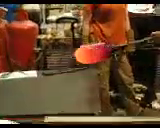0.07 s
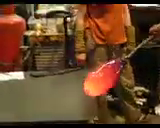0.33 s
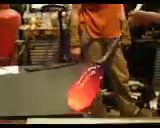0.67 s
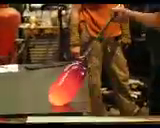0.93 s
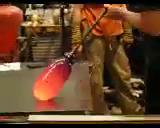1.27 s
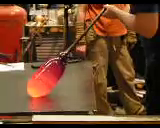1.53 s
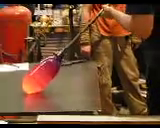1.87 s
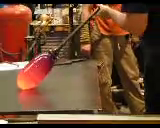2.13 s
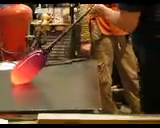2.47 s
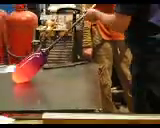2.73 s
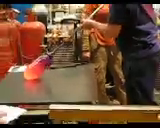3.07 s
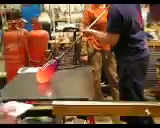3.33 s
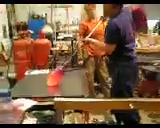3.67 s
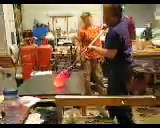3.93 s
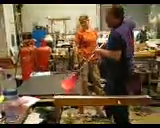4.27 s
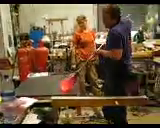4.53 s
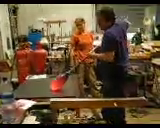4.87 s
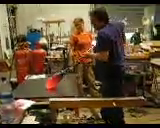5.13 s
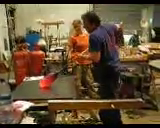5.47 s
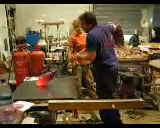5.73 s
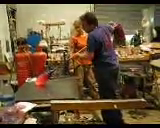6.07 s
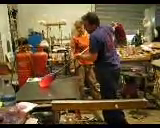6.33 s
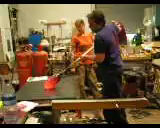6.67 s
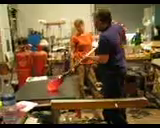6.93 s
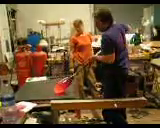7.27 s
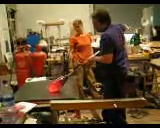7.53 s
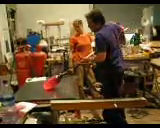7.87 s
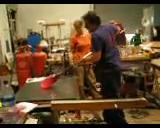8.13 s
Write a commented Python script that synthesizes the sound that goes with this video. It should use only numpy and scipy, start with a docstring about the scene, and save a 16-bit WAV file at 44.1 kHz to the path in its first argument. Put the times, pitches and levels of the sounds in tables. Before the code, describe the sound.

A gas furnace fills a glassblowing workshop with a steady, dense, slightly hollow roar. In front of it, a steel blowpipe scrapes and ticks as it is turned, briefly at the start and again in a longer run around the middle. After that, only a few faint, high squeaks come from the rolling pipe while the roar carries on. A small microphone makes everything sound a little dull.

```python
"""Glassblowing workshop

A gas furnace roars steadily as its swirling flame makes the chamber and the room ring.
A steel blowpipe scrapes and ticks as it is turned, and chirps faintly while hot glass is rolled on
the table. A small camera hears it all: it loses the high treble, turns itself down after the
sharpest ticks and flattens the highest peaks."""
import sys
import numpy as np
from scipy import signal
from scipy.fft import rfft, irfft
from scipy.io import wavfile
from scipy.ndimage import uniform_filter1d, minimum_filter1d

SR = 44100
rng = np.random.default_rng(int(sys.argv[2]) if len(sys.argv) > 2 else 0)


def transcribe(signal):
    """Save signal, clipped to [-1, 1], as a 16-bit WAV file at the path in sys.argv[1]."""
    frames = np.atleast_2d(signal).T
    limited = np.clip(frames, -1, 1)
    pcm = np.round(limited * 32767).astype(np.int16)
    wavfile.write(sys.argv[1], SR, pcm)


N = 365588
TIME = np.arange(N) / SR
FREQ = np.maximum(np.arange(N // 2 + 1) * SR / N, 1)

# The tone of the flame's rushing noise. Each row: frequency in Hz, relative level in dB.
FLAME_TONE = [(30, -31.5), (55, -26.5), (105, -6), (180, 0), (330, -4.3), (560, -3.6), (660, -1.8),
              (1150, -4.2), (1400, -9.4), (2300, -7.9), (3000, -11.3), (4200, -7), (6000, -30)]
# Notes where the furnace and room ring, and dips where echoes cancel.
# Each row: frequency in Hz, width in Hz, boost or cut in dB.
ROOM_NOTES = [(91, 11, -5.7), (131, 8, 2.7), (147, 17, -7.2), (195, 15, 3.0), (235, 37, 3.2),
              (277, 19, 6.4), (315, 26, 7.8), (386, 33, 6.9), (409, 15, -5.7), (436, 15, 5.9),
              (472, 71, 7.0), (528, 52, 7.3), (590, 26, 2.8), (636, 31, -4.0), (709, 17, -4.8),
              (824, 49, 4.8), (871, 20, 6.1), (904, 12, 2.5), (948, 8, -4.3), (1054, 44, 5.0),
              (1140, 26, 4.3), (1172, 11, 3.9), (1211, 39, 5.5), (1256, 30, 4.2), (1352, 23, 7.2),
              (1464, 30, 6.1), (1593, 36, 2.7), (1755, 34, 3.7), (1863, 77, 3.3), (2283, 30, 1.4)]
# The roar's low boom and hollow note swell and sink back.
# Each row: middle in seconds, length in seconds, boom change in dB, hollow note change in dB.
ROAR_SWELLS = [(0.216, 0.28, 8.5, 0.5), (1.294, 1.46, 3.5, 0.5), (3.35, 1.1, 4, -0.5), (4.758, .9, 4.5, 0),
               (7.416, 0.89, 0.5, 2.5), (8.055, 1.5, 7, .5)]
# The notes the steel pipe rings with. Each row: frequency in Hz, width in Hz, relative level in dB.
PIPE_NOTES = [(2480, 200, -10), (2770, 150, -7), (3015, 100, -1), (3135, 110, -2), (3330, 170, -4),
              (3500, 130, -4), (3980, 350, -1.5)]
# The turning pipe scrapes. Each row: start in seconds, end in seconds, level in dB.
SCRAPE_STROKES = [(0, 0.475, -17.7), (0.497, 0.594, -20), (0.855, 1.117, -24.5), (2.693, 2.847, -24.5),
                  (2.862, 2.933, -14.5), (2.958, 3.59, -16), (3.602, 3.848, -17), (3.873, 4.326, -18)]
# The pipe catches and ticks. Each row: start in seconds, ring level in dB, crack peak in dB.
PIPE_CATCHES = [(0.0714, -3.5, -12), (0.388, -2.5, -12), (0.423, -4.5, -17), (0.4712, 0, 8),
                (0.5908, -1, 6.5), (2.853, 2, -17), (2.922, -8.5, 5.5), (3.265, -7.5, -17),
                (3.545, -7, -12), (3.653, -7, 5.5), (3.7541, -1.5, 6.5), (3.903, -7, -1),
                (4.2648, -10.5, -18), (4.3213, -9, -14)]
# The rolling pipe chirps.
# Each row: start in seconds, length in seconds, middle pitch in Hz, pitch slide in Hz, level in dB.
PIPE_CHIRPS = [(.87, .23, 2970, 40, -27.5), (4.39, .09, 3600, 0, -29), (4.62, .16, 3620, 0, -32),
               (7.34, .1, 3570, 180, -26.5), (7.63, .06, 3410, 0, -27.5), (8.045, .125, 3465, -130, -24)]
# How the camera loses the treble. Each row: frequency in Hz, gain in dB.
CAMERA_TONE = [(2800, 0), (3450, -8), (4000, -26), (4400, -43), (4700, -70), (5200, -110)]


def furnace(level_db=-12.5, flutter_db=0.42, throb_db=0.83):
    """The fluttering flame rings the chamber; a low boom and a hollow note throb and swell."""
    flame = rng.standard_normal(N) * undb(flutter_db * wander(per_second=14))
    room_db = sum(db * abs(resonance(hz, width)) ** 2 for hz, width, db in ROOM_NOTES)
    roar = unit(filtered(flame, undb(spectrum_db(FLAME_TONE) + room_db)))
    boom_db, hollow_db = -1.0, -0.42
    for middle, length, boom_change, hollow_change in ROAR_SWELLS:
        swell = np.cos(np.pi * np.clip((TIME - middle) / length, -.5, .5)) ** 2
        boom_db += boom_change * swell
        hollow_db += hollow_change * swell
    boom, hollow = resonance(hz=305, width_hz=30), resonance(hz=500, width_hz=100)
    for note, swell_db in (boom, boom_db), (hollow, hollow_db):
        gain = undb(swell_db + throb_db * wander(per_second=9))
        roar += filtered(roar, note) * (gain - 1)  # turn just this note up or down
    return roar * undb(level_db)


def ring_pipe(force):
    """A push on the steel pipe sets all of its notes ringing."""
    response = sum((-1) ** k * undb(db) * resonance(hz, width)  # neighbours swing opposite ways
                   for k, (hz, width, db) in enumerate(PIPE_NOTES))
    return filtered(force, response)


def slips(per_second):
    """Steel slides in many tiny jerks of unequal size."""
    return (rng.random(N) < per_second / SR) * rng.uniform(-1, 1, N)


def pipe_scrapes(chatter_db=3.0, bite_s=0.011, let_go_s=0.007):
    """The turning pipe chatters on its support, and every slip makes it ring."""
    force = slips(per_second=3200) * undb(chatter_db * np.tanh(wander(per_second=120)))
    pressure = np.zeros(N)
    for start, end, db in SCRAPE_STROKES:
        bite = np.clip((TIME - start) / bite_s, 0, 1)
        let_go = np.clip((end - TIME) / let_go_s, 0, 1)
        pressure += undb(db) * bite * let_go
    return unit(ring_pipe(force)) * pressure


def pipe_ticks(fade_s=0.0037):
    """A harder catch briefly shakes and rings the pipe, with a short, high crack of steel on steel."""
    shake, snaps = np.zeros((2, N))
    for start_s, ring_db, crack_db in PIPE_CATCHES:
        start = int(start_s * SR)
        shake[start:] += undb(ring_db) * np.exp(-TIME[:N - start] / fade_s)
        snaps[start] = undb(crack_db)
    force = slips(per_second=8000)
    ring = ring_pipe(force * shake) / np.std(ring_pipe(force))
    crack_tone = resonance(hz=9000, width_hz=2500) ** 2
    crack_peak = abs(filtered(signal.unit_impulse(N), crack_tone)).max()
    return ring + filtered(snaps, crack_tone) / crack_peak


def pipe_chirps(waver_hz=35, rough_db=3):
    """Light rubbing makes one note squeak; it wavers, sometimes slides, and swells and fades."""
    waver = waver_hz * wander(per_second=150)
    grip = undb(rough_db * wander(per_second=150))
    chirps = np.zeros(N)
    for start, length, hz, slide_hz, db in PIPE_CHIRPS:
        progress = np.clip((TIME - start) / length, 0, 1)
        pitch = hz + slide_hz * (progress - .5) + waver
        squeak = unit(grip * np.sin(2 * np.pi * np.cumsum(pitch) / SR))
        swell = np.sqrt(np.sin(np.pi * progress))
        chirps += undb(db) * swell * squeak
    return chirps


def gain_control(x, above_db=3, strength=0.47, hold_s=0.096, recover_s=0.098):
    """A loud peak turns the volume down at once; it stays down briefly, then comes back."""
    wanted = np.maximum(abs(x) / undb(above_db), 1) ** -strength
    hold, recover = int(hold_s * SR), int(recover_s * SR)
    held = minimum_filter1d(wanted, hold, origin=(hold - 1) // 2, mode="nearest")
    recovering = uniform_filter1d(held, recover, origin=(recover - 1) // 2, mode="nearest")
    return x * np.minimum(held, recovering)


def limiter(x, above=.68, strength=.6, samples=133):
    """Turn the volume down for an instant around each high peak."""
    wanted = np.maximum(abs(x) / above, 1) ** -strength
    return x * uniform_filter1d(minimum_filter1d(wanted, samples), samples)


def undb(db):
    """Turn decibels into a number to multiply by."""
    return 10 ** (np.asarray(db) / 20)


def unit(x):
    """Scale a signal to an average (rms) level of 1."""
    return x / np.sqrt(np.mean(x ** 2))


def spectrum_db(points):
    """Join (Hz, dB) points into a curve over all frequencies."""
    hz, db = np.transpose(points)
    return np.interp(np.log(FREQ), np.log(hz), db)


def resonance(hz, width_hz):
    """The response of one ringing note; the narrower it is, the longer it rings."""
    return 1 / (1 + 1j * (FREQ ** 2 - hz ** 2) / (FREQ * width_hz))


def filtered(x, response):
    """Turn each frequency of a sound up or down by the given response."""
    return irfft(rfft(x) * response, N)


def wander(per_second):
    """A smooth random drift, made by rounding off random steps."""
    step = int(SR / per_second)
    steps = np.repeat(rng.standard_normal(N // step + 1), step)
    return unit(uniform_filter1d(uniform_filter1d(steps, step), step)[:N])


def scene():
    """The furnace fills the room; the pipe works in front of it."""
    return (furnace() + pipe_scrapes() + pipe_ticks() + pipe_chirps())[None]


def record(dry, ceiling=.71, off_centre=.041, top_hz=15800):
    """The camera dips the volume, dulls the treble, eases the peaks and flattens the highest."""
    dipped = gain_control(dry)  # reacts to the high cracks before the treble is lost
    dulled = filtered(dipped, undb(spectrum_db(CAMERA_TONE)))
    flattened = np.clip(limiter(dulled) + off_centre, -ceiling, ceiling)
    low_pass = signal.ellip(8, .2, 70, top_hz, fs=SR, output="sos")
    return signal.sosfilt(low_pass, flattened)


dry = scene()
out = record(dry)
transcribe(out)
```